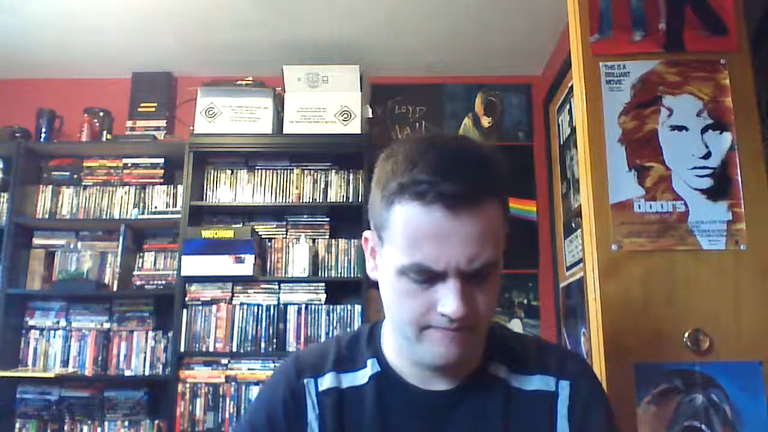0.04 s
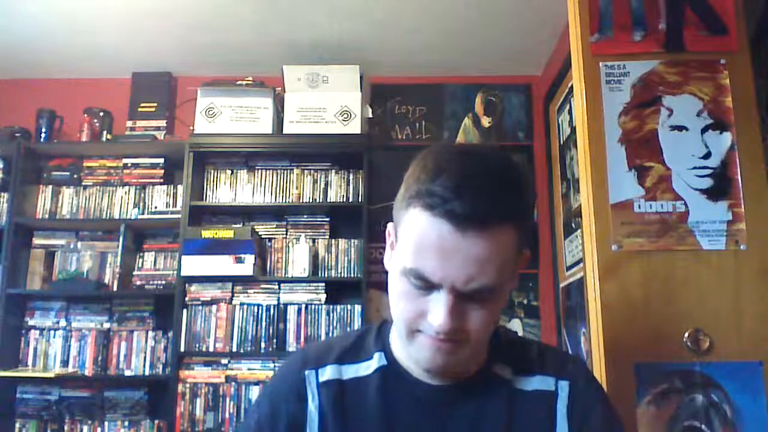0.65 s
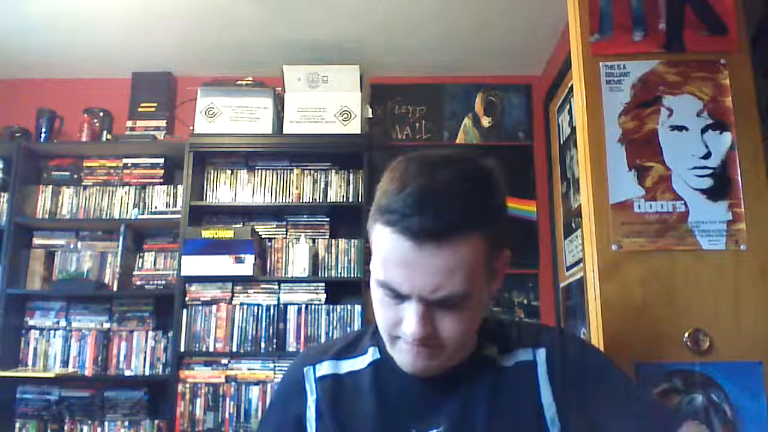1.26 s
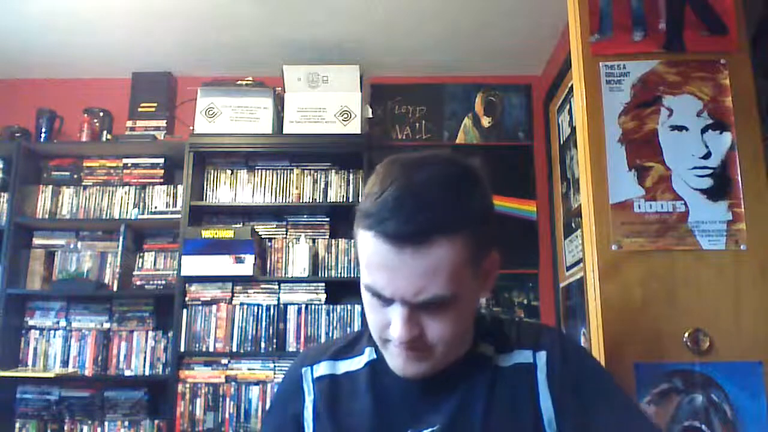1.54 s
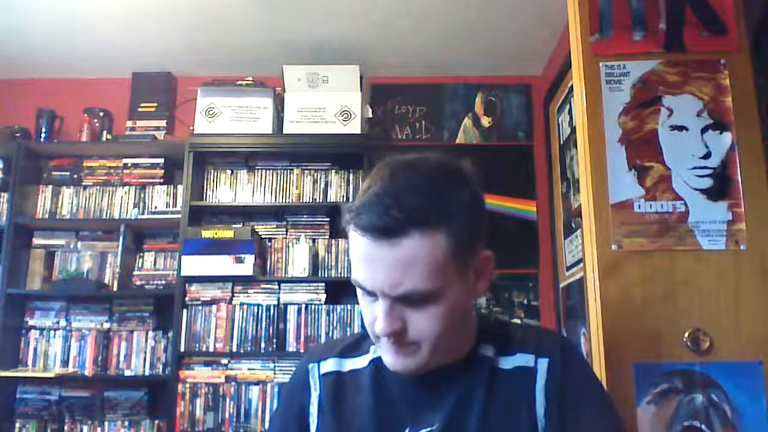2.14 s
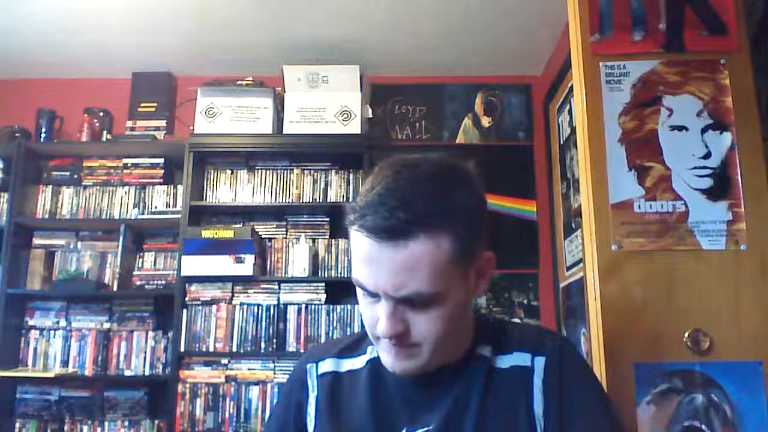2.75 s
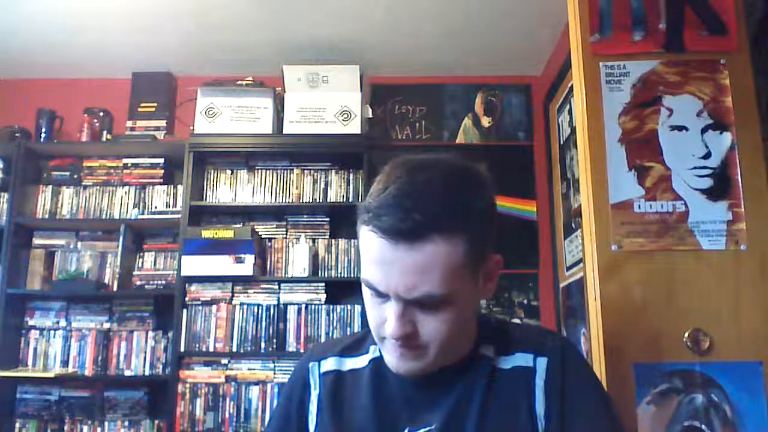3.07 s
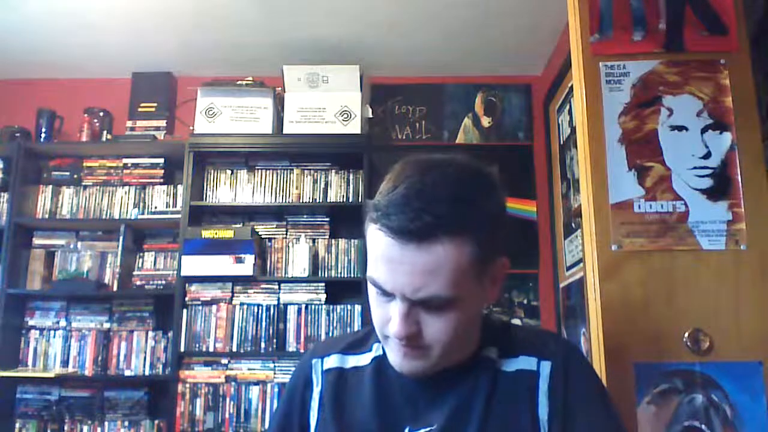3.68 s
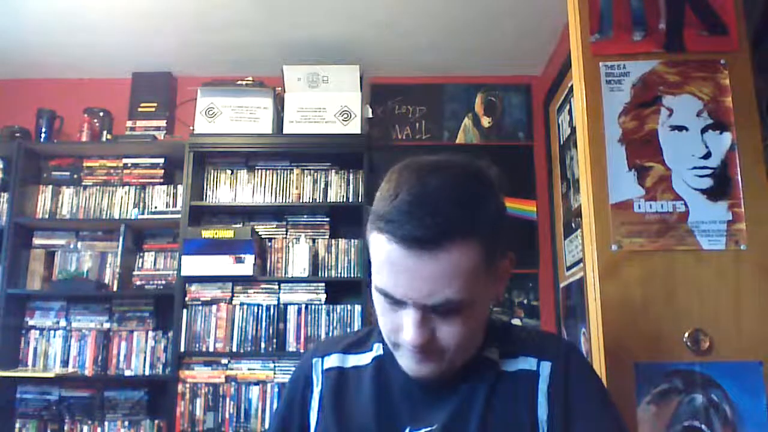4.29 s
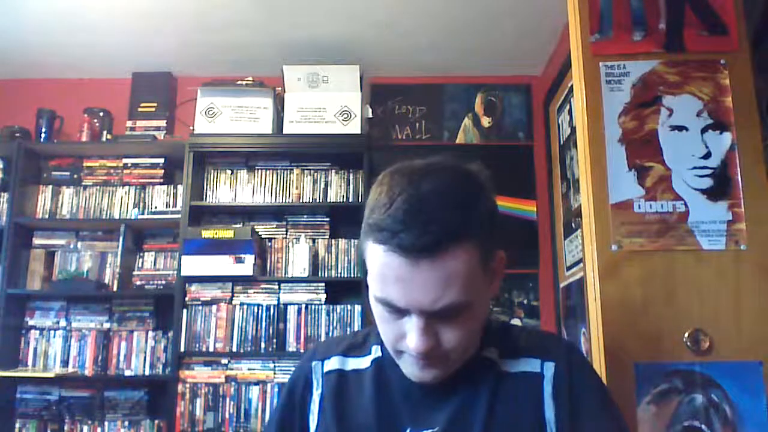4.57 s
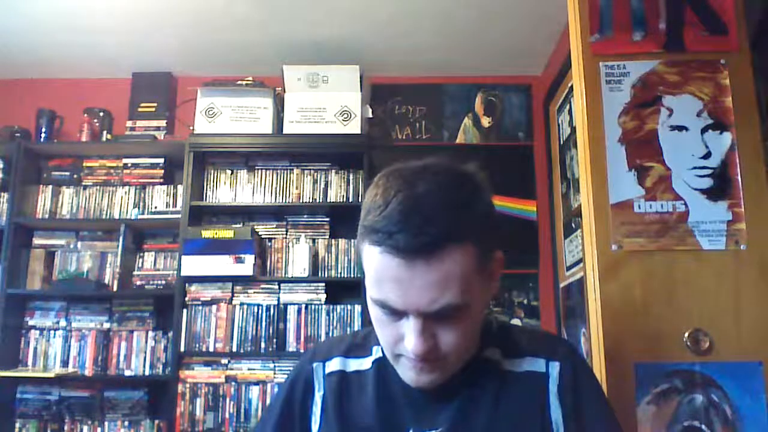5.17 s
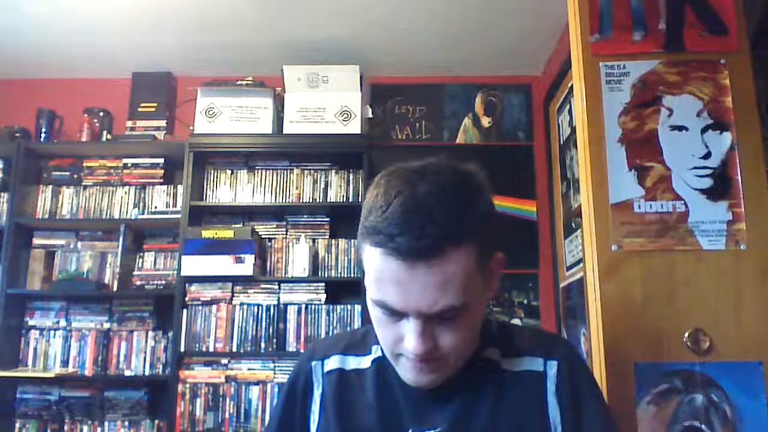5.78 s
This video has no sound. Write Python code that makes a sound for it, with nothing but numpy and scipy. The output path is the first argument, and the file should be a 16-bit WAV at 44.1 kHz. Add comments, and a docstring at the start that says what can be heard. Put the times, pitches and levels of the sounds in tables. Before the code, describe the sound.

Hands fiddle with a plastic disc case, making sharp clicks, small squeaks and a few soft thuds over faint hiss.

```python
"""A small furnished room, below a desk camera: a plastic disc case is being handled.
Its lid and hub click, rattle and snap, each contact a crack and a scuff that set the shell ringing.
It is set down twice with a dull bump and later nudged softly. Sliding fingers and plastic edges
stick and slip, so they rub, squeak and make the lid sing; one stroke is only an airy brush.
The two microphones add their own hiss over a low room rumble."""
import sys
import numpy as np
from scipy import signal
from scipy.fft import rfft, irfft, next_fast_len
from scipy.io import wavfile
from scipy.ndimage import map_coordinates

SR = 44100
rng = np.random.default_rng(int(sys.argv[2]) if len(sys.argv) > 2 else 0)


def store_wav(level_fs):
    """Save 16-bit WAV to argv[1]."""
    pcm = np.round(np.clip(np.atleast_2d(level_fs), -1, 1) * 32767)
    wavfile.write(sys.argv[1], SR, pcm.T.astype(np.int16))


N = 261292
SIZE = 16384  # samples in one hit or stroke
HZ, T = np.fft.rfftfreq(SIZE, 1 / SR), np.arange(SIZE) / SR
GRAZE_S = 0.005  # an edge grazes the surface for this long before it catches

# Lid and hub hits: (time [s], level [dB], sharpness [dB], knock [dB], clack [dB], fizz [dB],
# pan left over right [dB])
CLICK_HITS = [(0.1514, 8.5, -2, -28.5, -26, -16, -3), (.22, -2.5, -7, -13.5, -11, -18, -1),
              (.517, 3, -7, -23, -18, -38, -3), (.554, 2, -5, -13.5, -12, -22, -1),
              (0.562, 0, -8, -12.5, -8.5, -27, 1), (1.07, 5.5, -19, -6.5, -8, -14, -1.5),
              (1.088, -4.5, -12, -11, -4.5, -11, 2), (1.257, -8, -8, -4.5, -4, -25, 1),
              (1.7105, 9, -11, -10.5, -12, -10.5, -2.5), (1.722, 2.5, -17, -8.5, -7, -13, 2),
              (2.1585, 12.5, -2.5, -9.5, -14, -19, 0.5), (2.165, 7.5, -11, -24, -25, -10, -2),
              (2.274, -3, -7, -4, -7.5, -26, 3), (2.356, 14.5, -10, -19.5, -15, -16.5, -1),
              (2.389, 16, -5.5, -27, -12, -17, -4), (2.3969, 13.5, -10, -19.5, -12, -16, 5.5),
              (2.412, 17.5, -11, -24.5, -5.5, -8, -2), (2.421, 16, -6.5, -16, -36, -17, 1.5),
              (2.439, 3, -1, -42, -24, -8, -9), (2.584, -5, -7, -19, -8.5, -15, -1),
              (2.702, -13.5, -7, -20, -2, -20, -1), (2.968, -1, -8, -23.5, -7, -35, -1),
              (3.873, 2.5, -3.5, -31, -4, -13, -0.5), (3.9475, -2.5, -7, -14, -13.5, -12, -2),
              (3.954, -8, 1, -17, -22, -7, -1), (4.058, -8, -15, -8.5, -6, -9, -1),
              (5.0169, 5.5, -4.5, -16, -15.5, -19, -1.5), (5.0616, 11, 1, -16.5, -16.5, -12.5, -1),
              (5.0694, 6.5, -1, -14, -12, -11, -1), (5.477, -0.5, 1, -18.5, -15.5, -11, -2),
              (5.606, -13.5, 4, -12, -14, -6, -10)]
# Base tone of hard plastic: (frequency [Hz], level [dB])
CLICK_TONE = [(40, 10.5), (160, -5.5), (400, 5.5), (650, -3.5), (950, 5.5), (1500, 2.5), (2100, 1),
              (3000, -3), (5700, -4.5), (7400, 0), (8800, -6), (12000, -14), (15500, -11)]
def clicks():
    """Hard contacts: the spot touched sets knock, clack and fizz; sharp ones crack, close and dry."""
    out = np.zeros((2, N))
    for time, db, sharp_db, knock_db, clack_db, fizz_db, pan_db in CLICK_HITS:
        hit_eq = [(1100, knock_db), (2600, clack_db), (4800, -10), (7500, -10), (11000, fizz_db)]
        force = contact(scuff_t60=0.017, spike_db=sharp_db, graze_db=-20)
        blow = rfft(force) * case_ring(ring_db=-62)
        path = rfft(room(direct_db=sharp_db, early_db=-6.5, early_t60=0.11))
        click = irfft(coloured(blow * path, along(CLICK_TONE, HZ) + along(hit_eq, HZ)))
        add(out, time - GRAZE_S, amp(db) * panned(pan_db) * click)
    return out


def contact(scuff_t60, spike_db, graze_db):
    """The force of one touch: a faint graze, a sharp catch, then a short scuff of micro-impacts."""
    catch = round(GRAZE_S * SR)
    pressure = np.roll(fade(scuff_t60) * (1 - fade(0.0036)), catch)  # fast attack, then decay
    pressure[:catch] = amp(graze_db) * np.linspace(0, 1, catch)
    grains = rng.standard_normal(SIZE)
    force = unit(grains * np.abs(grains) * pressure)
    force[catch] = amp(spike_db) * np.sqrt(SIZE)
    return force


# Ring of the shell: (frequency [Hz], level [dB], decay t60 [s])
CASE_MODES = [(362, -19, 0.13), (879, -2.5, 0.19), (1097, -17, 0.24), (1750, 0, 0.1), (2280, 2, 0.21),
              (2780, 7, .26), (3240, 8, 0.18), (3750, -14, .1), (4740, 2, 0.16), (6340, -14, .12)]
def case_ring(ring_db):
    """The case's response: a dry crack plus its modes, at new strengths for each touch."""
    modes = np.zeros(SIZE)
    for hz, db, t60 in CASE_MODES:
        strength = amp(db + 2 * rng.standard_normal())
        modes += strength * np.sin(2 * np.pi * hz * T) * fade(t60)
    return 1 + amp(ring_db) * rfft(modes)


# Soft landings: (time [s], level [dB], thud [dB], edge [dB])
BUMP_HITS = [(.641, 16, -15.5, -12), (.665, 9.5, -11, -18), (1.75, 18, -15, -8.5), (1.778, 12.5, -13, -18),
             (4.675, 1, -21, -31)]
# Dark, cushioned body of a landing: (frequency [Hz], level [dB])
BUMP_TONE = [(20, 9), (45, 12.5), (100, 10), (140, 10), (195, 2.5), (260, 9.5), (370, 0.5), (510, 1),
             (660, -13.5), (950, -1), (1700, -8), (2600, -17), (3600, -29), (8000, -42)]
def bumps():
    """The case meets a padded surface: a low push with little treble."""
    out = np.zeros((2, N))
    for time, db, thud_db, edge_db in BUMP_HITS:
        hit_eq = [(200, thud_db), (400, -7), (800, -7), (1500, edge_db)]
        blow = rfft(contact(scuff_t60=0.031, spike_db=-3.5, graze_db=-15.5))
        path = rfft(room(direct_db=-5.5, early_db=3.5, early_t60=0.17))
        bump = irfft(coloured(blow * path, along(BUMP_TONE, HZ) + along(hit_eq, HZ)))
        add(out, time - GRAZE_S, amp(db) * bump)
    return out


# Strokes over the case: (time [s], length [s], rub [dB], squeak [dB])
SLIDE_STROKES = [(0.137, 0.025, -55.5, -43.5), (0.211, 0.032, -53, -50.5), (0.247, 0.022, -54.5, -49),
                 (0.289, 0.024, -54, -42.5), (0.436, 0.057, -56.5, -52), (.515, 0.012, -49.5, -42.5),
                 (0.563, 0.018, -54, -64), (.71, 0.038, -56, -54), (0.811, .11, -59.5, -56.5),
                 (0.963, 0.091, -55, -54.5), (1.099, 0.1, -56, -53), (1.242, 0.067, -53, -51),
                 (1.49, 0.094, -61, -55.5), (2.238, 0.042, -49.5, -49), (4.366, .11, -60, -56),
                 (4.623, 0.076, -55, -53), (4.89, 0.037, -50.5, -47), (4.948, 0.038, -52.5, -49),
                 (5.037, 0.023, -50.5, -41.5), (5.444, 0.034, -56, -64), (5.596, 0.017, -55.5, -58)]
# Dull rub of skin: (frequency [Hz], level [dB])
RUB_TONE = [(60, -32), (250, -8), (470, 2.5), (650, -7.5), (850, 1), (1020, 1.5), (1230, 0), (1480, -1),
            (2700, -5), (4000, -29), (12000, -21.5)]
# Bright squeak of plastic: (frequency [Hz], level [dB])
SQUEAK_TONE = [(1000, -44), (2700, -4.5), (3800, 0), (4700, -1), (6000, -1.5), (7300, 3.5), (9000, -6),
               (12000, -19), (15500, -26)]
def slides():
    """Skin rubs dully on the case; plastic on plastic is brighter. One stroke drives both."""
    out = np.zeros((2, N))
    for time, length, rub_db, squeak_db in SLIDE_STROKES:
        skin = amp(rub_db) * friction(RUB_TONE, grains_hz=301, smooth_db=-1.5)
        plastic = amp(squeak_db) * friction(SQUEAK_TONE, grains_hz=536, smooth_db=2)
        add(out, time, stroke(length) * (skin + plastic))
    return out


def friction(tone, grains_hz, smooth_db):
    """Tiny stick-slip grains over a smooth swish, heard through the room, at rms 1."""
    slips = (rng.random(SIZE) < grains_hz / SR) * rng.standard_normal(SIZE)
    force = unit(slips) + amp(smooth_db) * rng.standard_normal(SIZE)
    path = rfft(room(direct_db=-1, early_db=0.5, early_t60=0.024))
    return unit(irfft(coloured(rfft(force) * path, along(tone, HZ))))


def stroke(length, grip_s=0.006, swell_db=6):
    """A stroke's envelope: it grips, swells as it gathers speed, then lets go, slower if it is long."""
    grip = np.clip(T / grip_s, 0, 1)
    speed = np.clip(T / length, 0, 1)
    release = np.interp(T - length, T, fade(t60=0.16 + 2.9 * length))
    return grip * amp(swell_db * (speed - 1)) * release


# Edge drags on the lid: (time [s], length [s], level [dB], resonance [Hz])
CHAFE_STROKES = [(0.257, .008, -46, 860), (0.294, 0.022, -45.5, 4940), (0.442, .04, -58, 2800),
                 (0.519, 0.012, -43.5, 2750), (1.452, 0.097, -56.5, 2690), (2.261, 0.014, -46, 1124),
                 (4.902, 0.1, -55.5, 453), (5.44, 0.036, -59, 1250), (5.559, 0.16, -58.5, 1280)]
# The lid's singing peak: (frequency over resonance [ratio], level [dB])
LID_PEAK = [(.47, -20), (.8, -7.5), (1, 3), (1.17, -10), (1.75, -20.5)]
def chafes():
    """A dragging edge excites one broad resonance, which depends on where the lid is held."""
    out = np.zeros((2, N))
    for time, length, db, hz in CHAFE_STROKES:
        resonance = [(ratio * hz, level) for ratio, level in LID_PEAK]
        add(out, time, amp(db) * stroke(length) * friction(resonance, grains_hz=400, smooth_db=-2.5))
    return out


# Airy sheen, all top end: (frequency [Hz], level [dB])
BRUSH_TONE = [(3000, -20), (5500, -10), (7300, 1), (9300, -6), (11200, 4), (13000, -8), (15300, 0)]
def brush(time=3.57, length=0.34, db=-57):
    """A very light stroke that fades in and out and gives only a high hiss."""
    out = np.zeros((2, N))
    swell = np.sin(np.pi * np.clip(T / length, 0, 1))
    add(out, time, amp(db) * swell * friction(BRUSH_TONE, grains_hz=900, smooth_db=6))
    return out


# Short reverb of the furnished room: (frequency [Hz], decay t60 [s])
ROOM_DECAY = [(60, 0.8), (250, 0.14), (1000, 0.24), (2500, 0.23), (7000, 0.21), (14000, 0.21)]
def room(direct_db, early_db, early_t60):
    """One path to the microphones: direct sound, desk and shelf reflections, then the room's tail."""
    hz, t, bands = signal.stft(diffuse(SIZE), SR, nperseg=256)
    decay = amp(-60 * t / along(ROOM_DECAY, hz)[:, None])
    tail = signal.istft(bands * decay, SR, nperseg=256)[1][:, :SIZE]
    early = diffuse(SIZE) * fade(early_t60)
    path = unit(tail) + amp(early_db) * unit(early)
    path[:, 0] += amp(direct_db) * np.sqrt(SIZE)
    return unit(path) / np.sqrt(SIZE)


# Stereo width of the room: (frequency [Hz], side over mid [dB])
ROOM_WIDTH = [(100, -8), (350, -16), (900, -3.5), (2500, -1), (6000, 1)]
def diffuse(size):
    """Noise from all sides: alike at both microphones in the bass, unrelated in the treble."""
    mid, side = rng.standard_normal((2, size))
    side = filtered(side, lambda hz: amp(along(ROOM_WIDTH, hz)))
    return unit(np.array([mid + side, mid - side]))


# Low bed of room tone: (frequency [Hz], level [dB])
RUMBLE_TONE = [(10, 0.5), (22, 1.5), (50, -6.5), (90, -14), (125, -14.5), (190, -26.5), (245, -19),
               (310, -31.5), (400, -22.5), (630, -35), (900, -26.5), (1400, -36.5), (4000, -48.5)]
# Microphone hiss: (frequency [Hz], level [dB])
HISS_TONE = [(300, 9), (1500, 0), (3800, -1), (6100, 3), (7150, 10), (8500, 1.5), (11000, 2), (12800, -2.5),
             (15000, 1)]
# Where the hiss leans: (frequency [Hz], pan left over right [dB])
HISS_BALANCE = [(1500, 0), (4400, 2.5), (8000, 4.5), (11000, -2), (15000, -9.5)]
def background():
    """A gently wavering room rumble and the steady hiss of each microphone."""
    rumble = unit(filtered(diffuse(N), lambda hz: amp(along(RUMBLE_TONE, hz))))
    white = rng.standard_normal((2, N))
    hiss = unit(filtered(white, lambda hz: amp(along(HISS_TONE, hz)) * panned(along(HISS_BALANCE, hz))))
    return amp(-49.5 + 1.8 * wobble(6.7)) * rumble + amp(-53.5) * hiss


def amp(db):
    """Decibels to gain."""
    return 10 ** (np.asarray(db) / 20)


def unit(x):
    """Scale to rms 1."""
    return x / np.sqrt(np.mean(x ** 2) + 1e-20)


def along(points, hz):
    """Read a curve of (frequency [Hz], value) points on a log axis."""
    knots_hz, values = np.transpose(points)
    return np.interp(np.log(hz + 1), np.log(knots_hz), values)


def fade(t60):
    """An exponential decay that drops 60 dB in t60 seconds."""
    return np.exp(-np.log(1000) * T / max(t60, 1e-4))


def panned(db):
    """Left and right gains for a level difference."""
    return amp(np.array([db, -db]) / 2).reshape(2, -1)


def wobble(rate):
    """A smooth random curve, rate knots a second."""
    return map_coordinates(rng.standard_normal(int(N * rate / SR) + 4), [np.arange(N) * rate / SR])


def filtered(x, response):
    """EQ x with a gain given as a function of frequency."""
    n = x.shape[-1]
    padded = next_fast_len(n + SIZE)
    return irfft(rfft(x, padded) * response(np.fft.rfftfreq(padded, 1 / SR)), padded)[..., :n]


def coloured(spectra, db):
    """Give a sound this broad colour; its fine ripple stays random."""
    summed_power = np.cumsum(np.mean(np.abs(spectra) ** 2, axis=0))
    bins = np.arange(len(HZ))
    low = np.maximum(bins * 4 // 5 - 20, 0)
    high = np.minimum(bins * 5 // 4 + 20, bins[-1])
    band_power = (summed_power[high] - summed_power[low]) / (high - low)
    return spectra * causal(db - 10 * np.log10(band_power + 1e-12))


def causal(db):
    """The minimum-phase response with this gain: nothing sounds before the blow."""
    cepstrum = irfft(np.log(amp(db)))
    cepstrum[1:SIZE // 2] *= 2
    cepstrum[SIZE // 2 + 1:] = 0
    return np.exp(rfft(cepstrum))


def add(track, time, sound):
    """Mix a sound in at a time in seconds."""
    part = track[:, round(time * SR):][:, :SIZE]
    part += sound[:, :part.shape[1]]


def scene():
    """The handled case over the quiet room."""
    return clicks() + bumps() + slides() + chafes() + brush() + background()


def record(dry, top_hz=15900):
    """The camera keeps nothing above its band limit."""
    return filtered(dry, lambda hz: hz < top_hz)


dry = scene()
out = record(dry)
store_wav(out)
```